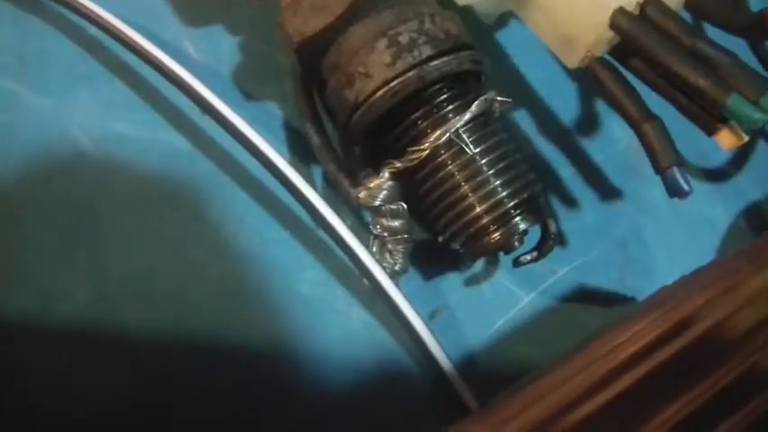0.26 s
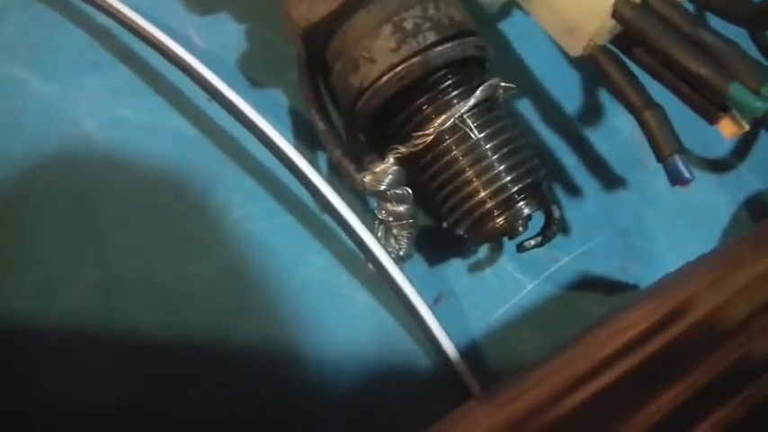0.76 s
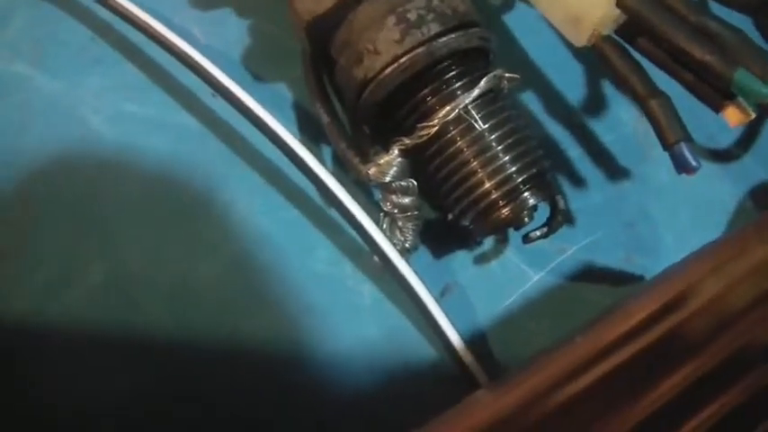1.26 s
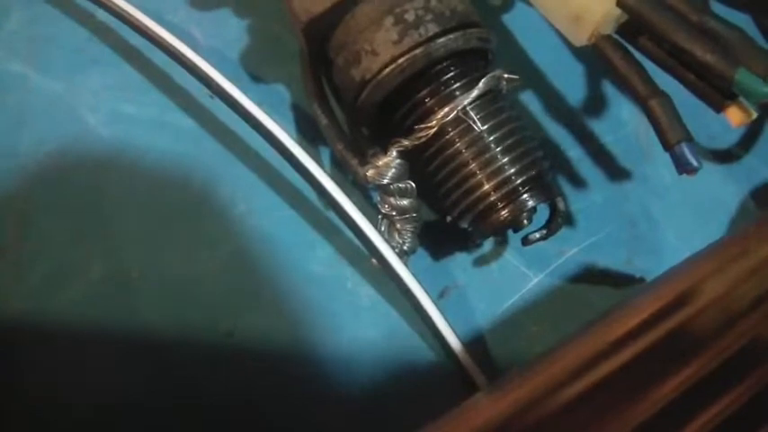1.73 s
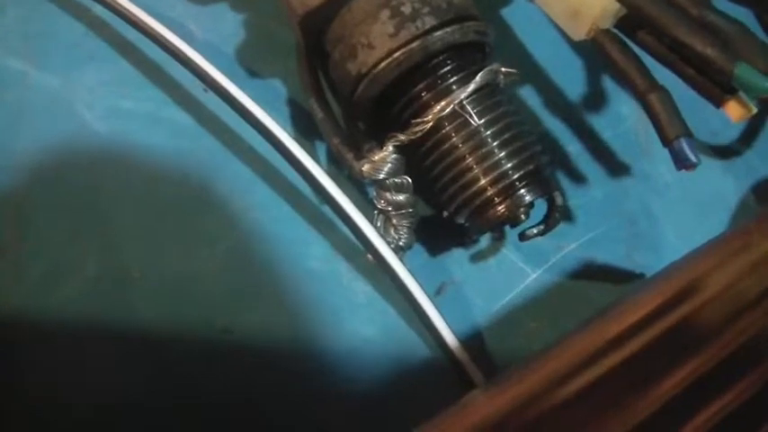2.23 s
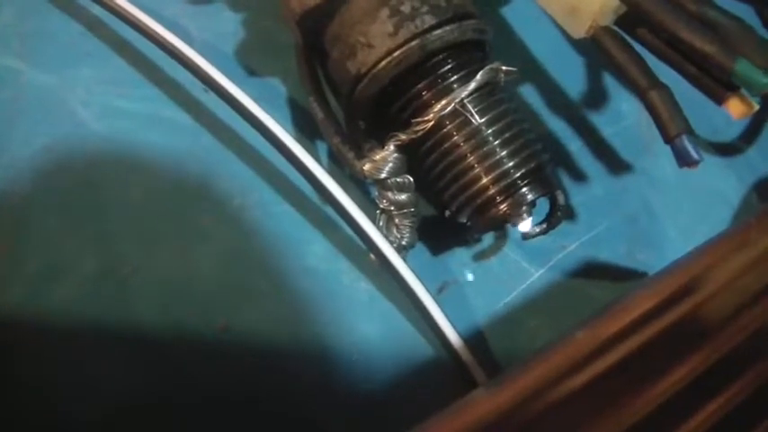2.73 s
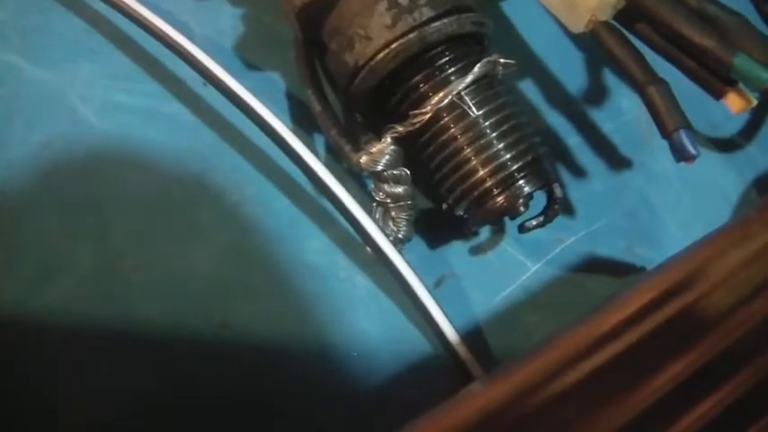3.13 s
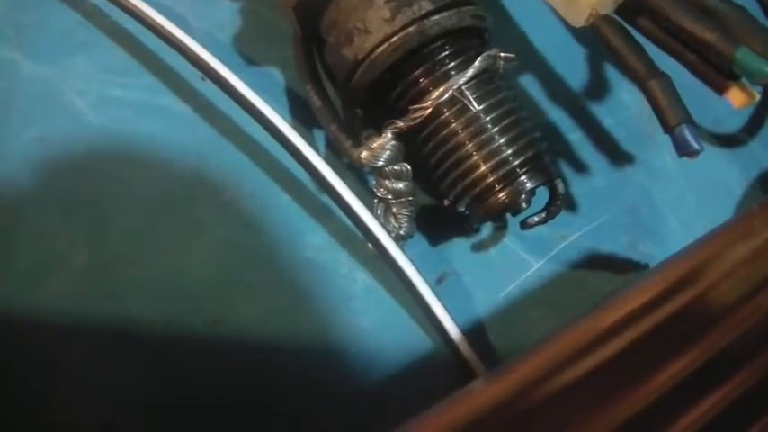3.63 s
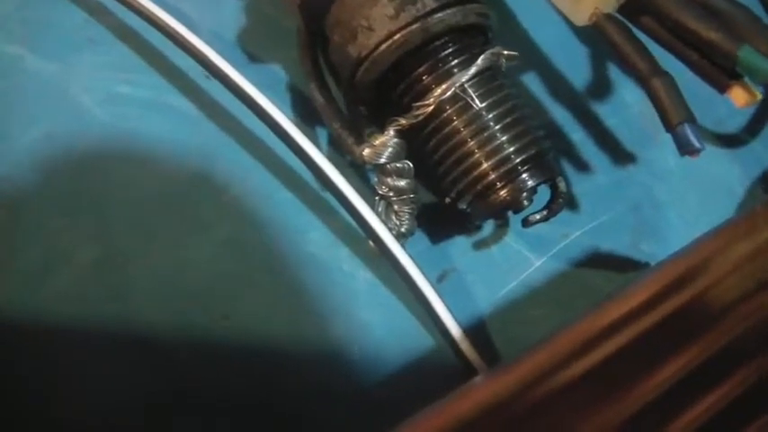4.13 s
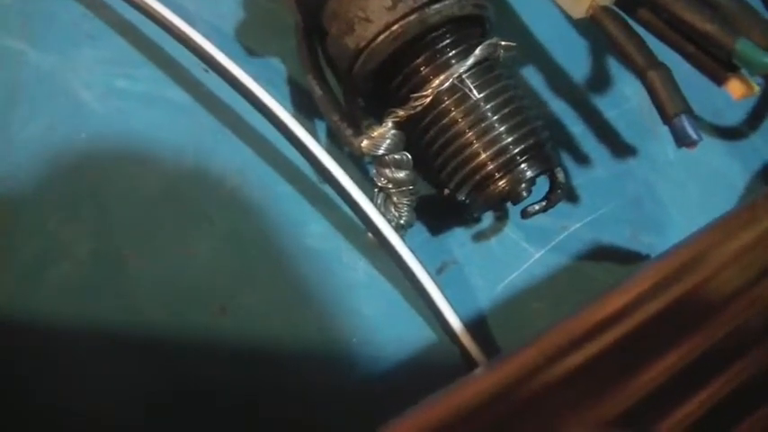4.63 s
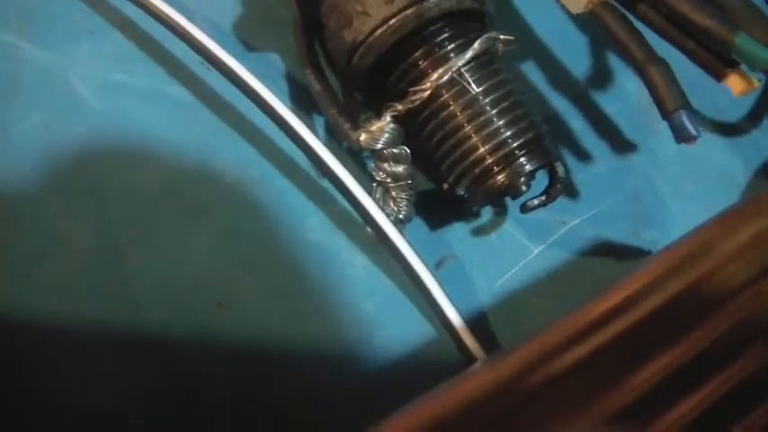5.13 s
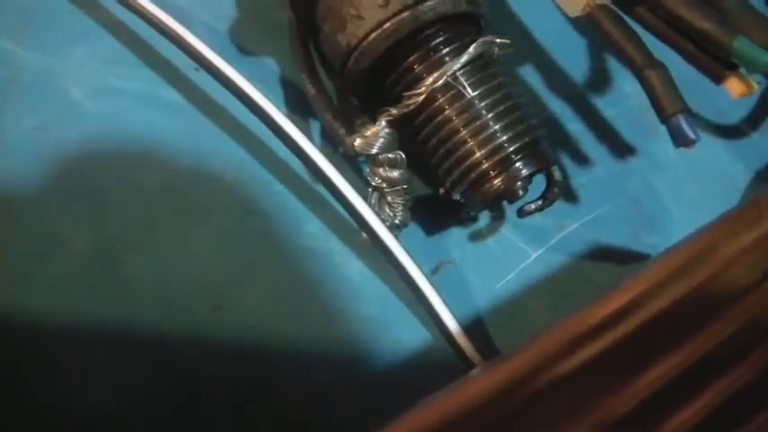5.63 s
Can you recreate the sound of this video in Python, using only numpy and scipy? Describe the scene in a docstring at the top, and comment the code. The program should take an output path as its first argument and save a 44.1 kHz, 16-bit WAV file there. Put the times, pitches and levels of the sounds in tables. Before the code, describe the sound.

A close, dry stereo pickup of a spark plug on a workbench in a small room. A tap opens, then scratching and a first hard, clipped snap at 0.4 s. Light taps, small chirps and a busy cluster of knocks and scrapes follow around 0.75-1.0 s. A bright crack comes at 1.3 s, then heavier taps at 1.75 and 1.96 s, with another crack at once at 1.97 s. Scrapes at 2.2-2.6 s lead to a thin electrical pop at 2.6 s among taps, and a strong double knock at 2.93 s. A loud crack lands at 3.46 s; a hard tap at 3.98 s precedes one at 4.04 s, followed by soft bumps and rubbing. A heavy tap at 4.76 s meets a crack at 4.79 s, and the last fires at 5.27 s. Scrapes and rustle finish. Cracks have brief ringing and short room tails; faint hiss and high whine persist.

```python
"""A spark plug fires now and then on a workbench with a snap that overloads the close microphone.
An ignition coil fires it; the coil's lead is tapped and scraped on a contact by hand.
Taps ring the bench as decaying modes, scrapes are trains of random slips, and cable sounds are shaped noise.
A small dry room, a low background and a faint electronic whine lie behind."""
import sys
import numpy as np
from scipy import signal
from scipy.fft import rfft, irfft
from scipy.io import wavfile
from scipy.ndimage import uniform_filter1d

SR = 44100
rng = np.random.default_rng(int(sys.argv[2]) if len(sys.argv) > 2 else 0)


def waveform_to_disk(signal):
    """Save audio, clipped to [-1, 1], as 16-bit WAV at the path in sys.argv[1]."""
    frames = np.transpose(np.atleast_2d(signal))
    scaled = np.clip(frames, -1, 1) * 32767
    samples = np.round(scaled).astype(np.int16)
    wavfile.write(sys.argv[1], SR, samples)


N = 259440


def amp(db):
    """Level law: converts decibels to an amplitude gain."""
    return 10 ** (np.asarray(db) / 20)


def unit(x):
    """Normalization: scales a signal to rms 1."""
    return x / np.sqrt(np.mean(x ** 2) + 1e-20)


def read(points, hz):
    """Interpolation: reads a table on a logarithmic frequency axis."""
    point_hz, value = np.transpose(points)
    return np.interp(np.log(hz + 1), np.log(point_hz + 1), value)


def add(mix, s, sound):
    """Superposition: adds a sound to the mix from time s in seconds."""
    part = mix[max(round(s * SR), 0):][:len(sound)]
    part += sound[:len(part)]


def colour(x, spectrum, tilt_db=0):
    """Spectral shaping: filters noise to a spectrum, tilted in dB per octave about 1 kHz, at rms 1."""
    hz = np.fft.rfftfreq(len(x), 1 / SR)
    octaves = np.log2(np.maximum(hz, 250) / 1000)  # the tilt is level below 250 Hz
    gain = amp(read(spectrum, hz) + tilt_db * octaves)
    return unit(irfft(rfft(x) * gain, len(x)))


def noise(spectrum, size, tilt_db=0):
    """Random excitation: coloured Gaussian noise of rms 1."""
    return colour(rng.standard_normal(size), spectrum, tilt_db)


def soften(x, hz):
    """Contact stiffness: a softer contact loses its treble, here through a low-pass."""
    lowpass = signal.butter(2, min(hz, SR / 3), fs=SR, output="sos")
    return signal.sosfilt(lowpass, x)


def decay(t, t60):
    """Exponential damping: the amplitude falls 60 dB in t60 seconds."""
    return np.exp(-np.log(1000) * t / t60)


def ringing(modes, t, length=1, low_db=0, spread_db=2.5, low_hz=650, detuning=0.012):
    """Modal superposition: a struck body sums damped sines; no two blows land on the same spot."""
    hz, db, t60 = np.transpose(modes)[:, :, None]
    sign = (-1) ** np.arange(len(modes))[:, None]  # neighbouring modes swing in opposite senses
    place, detune = rng.standard_normal((2, len(modes), 1))
    size = amp(db + spread_db * place + low_db * (hz < low_hz))
    wave = np.sin(2 * np.pi * hz * (1 + detuning * detune) * t)
    return (sign * size * decay(t, t60 * length) * wave).sum(0)


def touches(rows, t60, rise_s, skirt_db):
    """Band-limited impact: each light contact is a short noise burst around one pitch."""
    out, t = np.zeros(N), np.arange(SR // 5) / SR
    for s, db, hz in rows:
        band = [(hz / 8, 3 * skirt_db), (hz / 2, skirt_db), (hz, 0),
                (hz * 2, skirt_db), (hz * 8, 4 * skirt_db)]
        envelope = decay(t, t60) * (1 - np.exp(-t / rise_s))
        add(out, s, amp(db) * noise(band, len(t)) * envelope)
    return out


# Background noise spectrum. Each row: frequency in Hz, relative level in dB per Hz.
FLOOR_SPECTRUM = [(25, -4.5), (60, -6.5), (130, -16.5), (240, -4.5), (350, -9.5), (450, -17), (1000, -17.5),
                  (1350, -9.5), (2100, -25.5), (4500, -23), (8000, -23), (15000, -25.5)]
# Supply whines. Each row: mean frequency in Hz, rms level in dB before the port gains,
# stop time in seconds (past the end: sounds throughout).
WHINE_TONES = [(5160, -64.5, 6.9), (10218, -71, 6), (12209, -63.5, 6), (13404, -66, .65)]


def background(floor_db=-46, shared_hz=1800, waver_hz=22):
    """Partial coherence: ports share the room murmur, hiss separately and carry a thin wavering whine."""
    hz, t = np.fft.rfftfreq(N, 1 / SR), np.arange(N) / SR
    common, *own = rfft(rng.standard_normal((3, N))) * (hz < 15250)
    share = np.clip(0.84 / (1 + (hz / shared_hz) ** 2), 0, 1)  # shared part of the power
    mixed = [np.sqrt(share) * common + np.sqrt(1 - share) * hiss for hiss in own]
    air = np.array([colour(irfft(port, N), FLOOR_SPECTRUM) for port in mixed])
    waver = unit(uniform_filter1d(rng.standard_normal(N), size=300))
    drift = waver_hz * np.cumsum(waver) / SR  # in cycles
    whine = np.zeros(N)
    for tone_hz, db, stop in WHINE_TONES:
        tone = unit(np.sin(2 * np.pi * (tone_hz * t + drift)))
        whine += amp(db) * tone * (t < stop)
    return amp(floor_db) * air + whine * amp([[-3], [2]])  # left and right whine gains in dB


# Cable rustle spectrum. Each row: frequency in Hz, relative level in dB per Hz.
RUSTLE_SPECTRUM = [(30, 5), (120, -1), (350, 3.5), (600, 2.5), (1400, -8.5), (2000, -6.5), (2700, -5.5),
                   (4200, -12.5), (5500, -17), (12000, -33)]
# Shifts of the cable in the hand. Each row: start of the hold in seconds, hold length in seconds,
# median level in dB, treble tilt in dB per octave.
CABLE_SHIFTS = [(0.275, 0.17, -44.5, 3), (2.063, 0.17, -43, 1), (2.542, 0.2, -39, -1.5),
                (3.196, 0.15, -39, .5), (3.467, 0.39, -41, -0.5), (4.412, 0.15, -38.5, 0),
                (4.918, 0.2, -40.5, 0.5), (5.393, 0.36, -46.5, 1.5), (5.748, 0.17, -38.5, 2)]


def handling(held_db=-50, rise_s=0.089, fall_s=0.025, uneven_db=3.5):
    """Frictional noise: a soft, uneven rustle swells, holds and dies away each time the cable moves."""
    t = np.arange(N) / SR
    out = amp(held_db) * noise(RUSTLE_SPECTRUM, N)  # the held cable barely stirs
    for start, length, db, tilt_db in CABLE_SHIFTS:
        before, after = np.maximum(start - t, 0), np.maximum(t - start - length, 0)
        envelope = np.exp(-before / rise_s - after / fall_s)
        out = out + amp(db) * envelope * noise(RUSTLE_SPECTRUM, N, tilt_db)
    smooth = uniform_filter1d(rng.standard_normal(N), size=900)
    lumps = unit(uniform_filter1d(smooth, size=600))
    return amp(uneven_db * lumps) * out


# Blows of the lead on the contact. Each row: start in seconds, level in dB,
# hardness as a low-pass cut-off in Hz.
TAP_BLOWS = [(.0, -3.5, 3300), (.492, -8.5, 2880), (0.8877, -4.5, 4560), (.909, -19, 5000),
             (.922, -9.5, 5850), (0.9586, -18, 3900), (.980, -22.5, 4500), (1.003, -17, 4000),
             (1.285, -2.5, 3830), (1.664, -10.5, 7800), (1.7422, 9, 1830), (1.962, 7, 3000),
             (2.5708, 0.5, 5140), (2.6437, 3.5, 2240), (2.693, 8, 2440), (2.9315, 14, 2450),
             (2.9384, 17, 2700), (3.1739, -8, 3100), (3.9477, -17, 6960), (3.9823, 13.5, 2900),
             (4.451, -15, 6000), (4.76, 18, 3230), (5.32, -6, 2500)]
# Modes of the bench under the contact. Each row: nominal frequency in Hz, median level in dB
# before the low-mode shift, 60 dB decay time in seconds before the length factor.
BENCH_MODES = [(225, -22.5, 0.079), (311, -15.5, 0.043), (479.5, -9, 0.063), (560, -12.5, 0.058),
               (737, -8.5, 0.03), (887, -15.5, 0.033), (950, -23, 0.073), (1178, -11, 0.035),
               (1341, -4.5, 0.034), (1650, -18.5, 0.05), (1883, -18, 0.032), (2295, -20, 0.027),
               (2420, -29, 0.013), (2788, -17.5, 0.036), (3550, -24, 0.038), (3920, -17.5, 0.047),
               (4570, -15, 0.036)]
# Small-part clatter spectrum. Each row: frequency in Hz, relative level in dB per Hz.
CLATTER_SPECTRUM = [(40, -6.5), (200, 2), (500, 1), (1350, -4.5), (1700, 2), (2300, -5), (4600, -5.5),
                    (5600, -1), (9000, -10.5), (15000, -6)]
# Room spectrum, also used by cracks. Each row: frequency in Hz, relative level in dB per Hz.
ROOM_SPECTRUM = [(40, -28), (150, -5), (300, 6.5), (900, -1.5), (1400, 1.5), (2100, -6.5), (3200, -6),
                 (4400, -2.5), (5300, -12.5), (8500, -28), (11000, -37), (15000, -42)]


def taps(clatter_db=-11, clatter_t60=0.0495, room_db=-32, room_t60=0.19, ring_length=0.9):
    """Impact excitation: each blow rings bench modes, with a dense clatter of small parts and a little room."""
    out, t = np.zeros(N), np.arange(SR // 5) / SR
    for s, level_db, hard_hz in TAP_BLOWS:
        low_db = -1 - 0.21 * level_db  # a light tap favours low modes, a heavy one the upper modes
        ring = ringing(BENCH_MODES, t, ring_length, low_db)
        clatter = amp(clatter_db) * noise(CLATTER_SPECTRUM, len(t)) * decay(t, clatter_t60)
        room = amp(room_db) * noise(ROOM_SPECTRUM, len(t)) * decay(t, room_t60)
        add(out, s, amp(level_db) * soften(ring + clatter + room, hard_hz))
    return out


# Brief chirps of the contact. Each row: peak time in seconds,
# half length in seconds (Gaussian deviation), level in dB, mean pitch in Hz.
CONTACT_CHIRPS = [(0.044, 0.0064, -35.5, 1190), (0.642, 0.0029, -34, 1186), (0.73, 0.0094, -27, 814),
                  (.775, 0.0029, -27, 887), (1.557, 0.0028, -24.5, 839), (4.029, 0.0083, -25, 1124)]


def chirps(wobble=0.18):
    """Stick-slip oscillation: slipping turns regular for a few milliseconds, giving a rough little tone."""
    out, t = np.zeros(N), np.arange(SR // 16) / SR
    middle = t[-1] / 2
    for s, half, db, hz in CONTACT_CHIRPS:
        roughness = unit(uniform_filter1d(rng.standard_normal(len(t)), size=60))
        pitch = hz * (1 + wobble * roughness)
        swell = np.exp(-.5 * ((t - middle) / half) ** 2)
        tone = unit(np.sin(2 * np.pi * np.cumsum(pitch) / SR))
        add(out, s - middle, amp(db) * swell * tone)
    return out


# Strokes of the lead over the contact. Each row: peak time in seconds,
# length in seconds (rise plus fall deviations), level in dB.
SCRAPE_STROKES = [(0.165, 0.04, -34), (0.361, 0.02, -39), (0.752, 0.052, -30.5), (0.909, 0.036, -21),
                  (0.983, 0.052, -29.5), (1.308, 0.024, -22.5), (1.566, 0.037, -34.5),
                  (1.665, 0.035, -33.5), (2.224, 0.032, -19), (2.411, 0.042, -25), (2.49, 0.017, -27.5),
                  (2.564, 0.033, -21.5), (2.676, 0.015, -27), (3.073, 0.029, -26.5), (3.703, .066, -34),
                  (3.967, 0.018, -28.5), (4.028, 0.019, -22), (4.127, 0.068, -33.5), (4.216, .06, -27),
                  (4.492, 0.034, -27.5), (4.972, 0.046, -25.5), (5.018, 0.015, -25.5),
                  (5.445, 0.056, -28.5), (5.591, 0.037, -28), (5.713, 0.027, -27)]
# Rubbing spectrum. Each row: frequency in Hz, relative level in dB per Hz.
RUB_SPECTRUM = [(40, -24), (150, -4.5), (450, 3), (900, 1), (1350, 2.5), (2000, -5.5), (3000, -9.5),
                (4600, -7.5), (5400, -13.5), (9000, -13), (15000, -6)]


def scrapes(slips_per_s=700, smooth=1.0, chatter_db=1.0, rise_share=0.52,
            typical_s=0.043, typical_hz=4100, brightening=0.31):
    """Dry friction: tiny slips of metal on metal swell, chatter and fade under each stroke."""
    out, t = np.zeros(N), np.arange(SR // 3) / SR
    for s, length, db in SCRAPE_STROKES:
        rise, fall = length * rise_share, length * (1 - rise_share)
        # a longer stroke gathers more speed and sounds brighter
        bright_hz = typical_hz * (length / typical_s) ** brightening
        start = max(s - t[-1] / 2, 0)
        since = start + t - s
        stroke = np.exp(-.5 * (since / np.where(since < 0, rise, fall)) ** 2)
        slips = rng.standard_normal(len(t)) * (rng.random(len(t)) < slips_per_s / SR)
        chatter = unit(uniform_filter1d(rng.standard_normal(len(t)), size=200))
        rubbing = unit(slips) + smooth * rng.standard_normal(len(t))
        grit = colour(amp(chatter_db * chatter) * rubbing, RUB_SPECTRUM)
        add(out, start, amp(db) * stroke * unit(soften(grit, bright_hz)))
    return out


# Ticks of fine wire ends. Each row: start in seconds, level in dB.
WIRE_TICKS = [(0.271, -28), (.320, -38), (0.493, -38), (1.665, -24), (2.713, -30), (3.9492, -22.5),
              (4.451, -29), (4.532, -29), (5.741, -33), (5.824, -46)]


def ticks(pitch_hz=4600):
    """Light impact: fine wire ends tick as fast, high-pitched noise bursts."""
    rows = [(s, db, pitch_hz) for s, db in WIRE_TICKS]
    return touches(rows, t60=0.034, rise_s=0.00023, skirt_db=-16.0)


# Firings of the plug, also used by cracks. Each row: start in seconds, crack level in dB,
# treble tilt in dB per octave, room tail level in dB, low ring shift in dB, electrical kick level in dB.
SPARK_FIRINGS = [(0.378, 16.5, -3.5, -9.5, -14, 12), (1.3157, 17, -1.5, -7, -2.5, 15.5),
                 (1.9712, 15, -1, -9.5, -0.5, 11.5), (2.611, -14.5, 7, -21, -11, 15),
                 (3.4641, 18.5, -1.5, -6, -4, 12), (4.037, 16, -0.5, -9.5, 2, 8),
                 (4.7926, 13, -1.5, -10.5, -0.5, 9.5), (5.2731, 18, -1, -6.5, -6.5, -2)]


def kicks(kick_s=0.00058, recover_s=0.046, undershoot=0.02, fizz=0.28, unequal_db=3):
    """Transient response: the discharge jolts each microphone circuit unequally, then it swings slowly back."""
    out, t = np.zeros((2, N)), np.arange(SR // 4) / SR
    for s, *_, kick_db in SPARK_FIRINGS:
        for channel in out:
            # random factors on the nominal pulse time and undershoot
            stretch, depth = amp(unequal_db * rng.standard_normal(2))
            pulse = np.exp(-t / (kick_s * stretch)) * (1 + fizz * rng.standard_normal(len(t)))
            swing = undershoot * depth * np.exp(-t / recover_s)
            add(channel, s, amp(kick_db) * (pulse - swing))
    return out


# Crack spectrum. Each row: frequency in Hz, relative level in dB per Hz before the low shift and tilt.
CRACK_SPECTRUM = [(40, -28), (250, -8), (500, -4), (900, -5), (1350, 2.5), (2100, -15.5), (4400, -6.5),
                  (5600, -16.5), (9000, -25), (15000, -68)]
# Modes of the space around the plug. Each row: nominal frequency in Hz, median level in dB
# before the low shift, 60 dB decay time in seconds before the length factor.
NOOK_MODES = [(493, -9, 0.057), (596, -12, 0.04), (797, -15.5, 0.052), (970, -9, 0.045),
              (1250, -5.5, 0.052), (1330, -13, 0.042), (1430, -12, 0.026), (1632, -10, 0.045),
              (1878, -11.5, 0.052), (2524, -20, 0.053), (2865, -16, 0.054), (4020, -17.5, 0.066),
              (4380, -21.5, 0.059)]


def cracks(flight_s=0.0014, crack_t60=0.028, ring_db=-2.0, room_t60=0.15, build_s=.003, echoes_per_s=8000):
    """Propagation delay: the crack trails the flash, rings the space around the plug and scatters in the room."""
    out, t = np.zeros(N), np.arange(SR // 4) / SR
    for s, crack_db, tilt_db, room_db, low_db, _ in SPARK_FIRINGS:
        spectrum = [(hz, db + low_db * (hz < 650)) for hz, db in CRACK_SPECTRUM]
        crack = noise(spectrum, len(t), tilt_db) * decay(t, crack_t60)
        ring = amp(ring_db) * ringing(NOOK_MODES, t, length=0.8, low_db=low_db)
        echoes = rng.standard_normal(len(t)) * (rng.random(len(t)) < echoes_per_s / SR)
        envelope = decay(t, room_t60) * (1 - np.exp(-t / build_s))
        room = amp(room_db) * colour(echoes, ROOM_SPECTRUM) * envelope
        add(out, s + flight_s, amp(crack_db) * (crack + ring) + room)
    return out


# Dull knocks of the insulated cable. Each row: start in seconds, level in dB, low-pass cut-off in Hz.
CABLE_KNOCKS = [(0.7596, -8.5, 1600), (.936, -5, 1900), (1.218, -17, 1500), (1.610, -15, 1600),
                (1.947, -9, 1400), (2.062, -19, 596), (3.027, -20.5, 700)]
# Modes of the cable. Each row: nominal frequency in Hz, median level in dB, 60 dB decay time in seconds.
CABLE_MODES = [(294, -3, 0.022), (520, -12, 0.051), (786, -0.5, 0.0093), (1250, -7.5, 0.025)]


def knocks():
    """Compliant impact: soft insulation gives a short knock with little treble."""
    out, t = np.zeros(N), np.arange(SR // 10) / SR
    for s, level_db, soft_hz in CABLE_KNOCKS:
        add(out, s, amp(level_db) * soften(ringing(CABLE_MODES, t), soft_hz))
    return out


# Soft bumps of the hand on the bench. Each row: start in seconds, level in dB, pitch in Hz.
HAND_BUMPS = [(3.21, -25.5, 100), (4.085, -20, 282), (4.12, -22, 150), (4.185, -23, 220), (4.235, -22, 170),
              (4.915, -30, 146), (5.735, -24, 119), (5.775, -28, 222)]


def bumps():
    """Soft impact: the yielding hand meets the bench in slow-rising, low-pitched bursts."""
    return touches(HAND_BUMPS, t60=0.14, rise_s=0.0093, skirt_db=-13.0)


# Phase between the ports. Each row: frequency in Hz, left lead in radians before the low-frequency merging.
PHASE_LEAD = [(100, -0.3), (1200, 0.3343), (2200, 0.37), (3800, 1.5), (5000, 2), (6900, 5), (8000, 6.5),
              (15000, 9)]
# Balance of the ports. Each row: frequency in Hz, left minus right in dB before the low-frequency merging.
LEVEL_BALANCE = [(500, 0.5), (1500, -0.9), (2600, -1), (4600, -5), (5700, 8), (7000, 0), (8600, 2),
                 (15000, 6)]


def ports(x):
    """Spatial coherence: two microphone ports differ in phase and level, but long waves reach both alike."""
    hz = np.fft.rfftfreq(N, 1 / SR)
    apart = 1 - np.exp(-(hz / 500) ** 2)
    left = amp(apart * read(LEVEL_BALANCE, hz) / 2)
    right = np.exp(-1j * apart * read(PHASE_LEAD, hz)) / left
    return irfft(rfft(x) * np.array([left, right]), N)


def scene():
    """Superposition: everything on the bench, heard from close by."""
    hand = handling() + taps() + chirps() + scrapes() + ticks() + knocks() + bumps()
    return background() + kicks() + ports(hand + cracks())


def record(dry, edge_hz=15900):
    """Saturation: the input clips flat on loud sounds, then a linear-phase low-pass limits the band."""
    clipped = np.clip(dry, -.98, .98)
    lowpass = signal.firwin(511, edge_hz, window=("kaiser", 9), fs=SR)
    return signal.oaconvolve(clipped, lowpass[None], "same")


dry = scene()
out = record(dry)
waveform_to_disk(out)
```